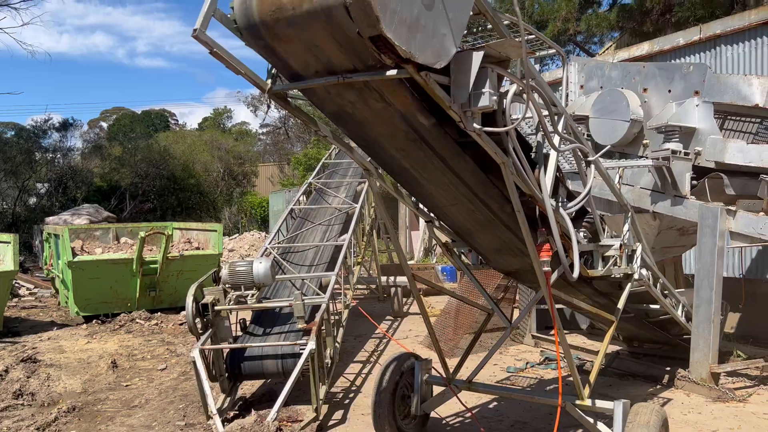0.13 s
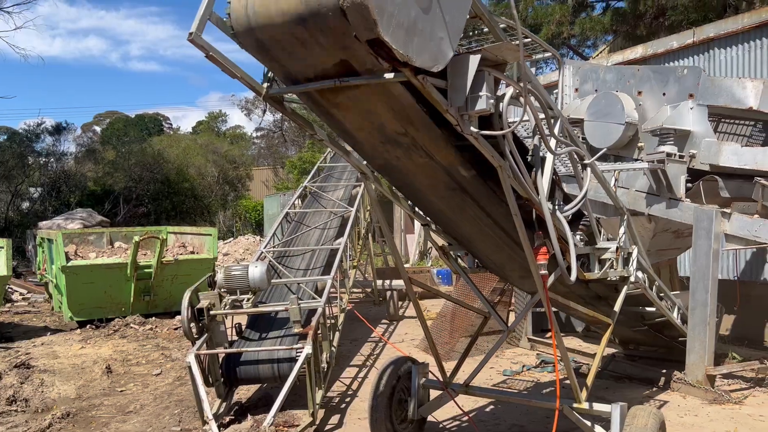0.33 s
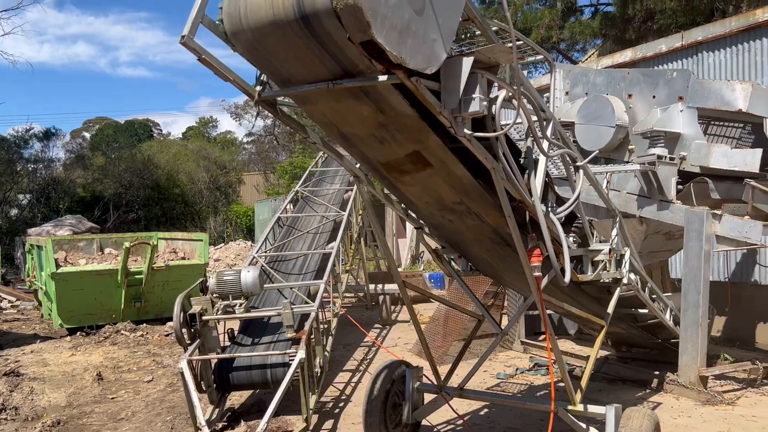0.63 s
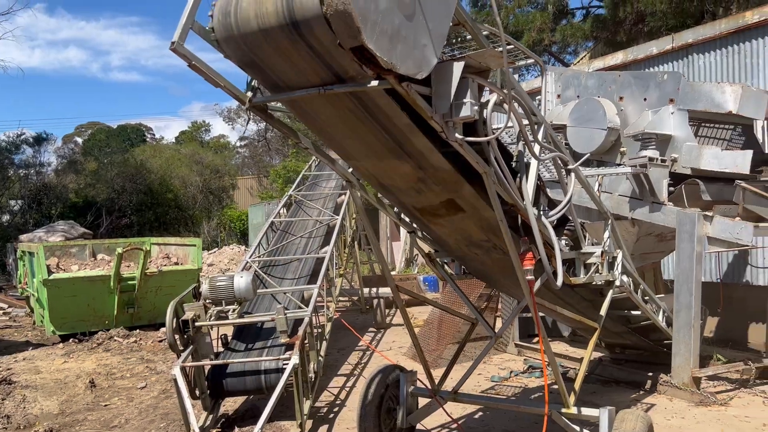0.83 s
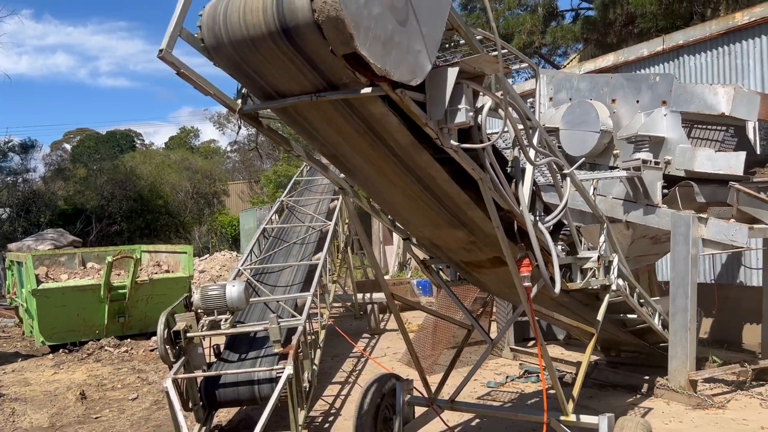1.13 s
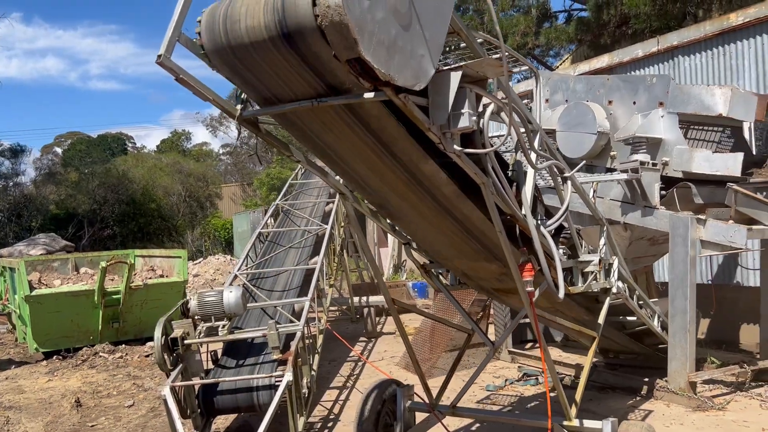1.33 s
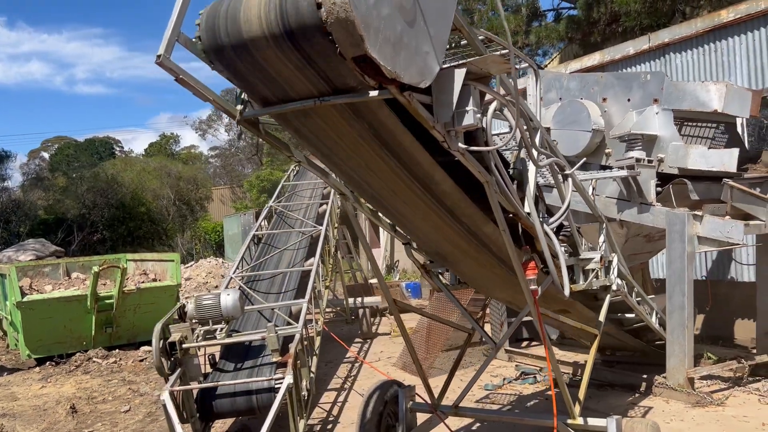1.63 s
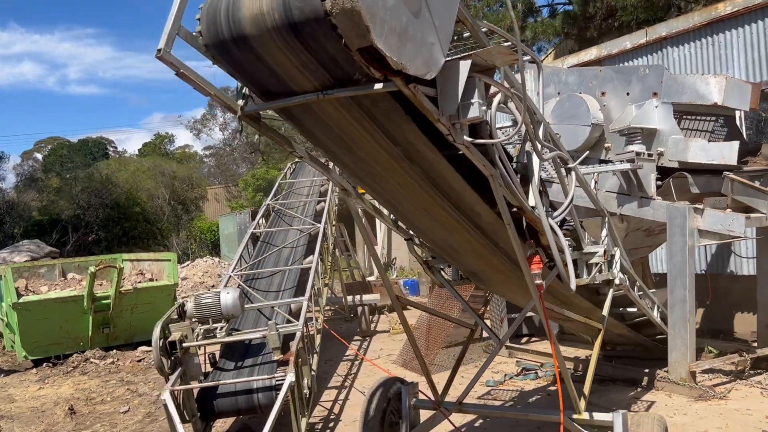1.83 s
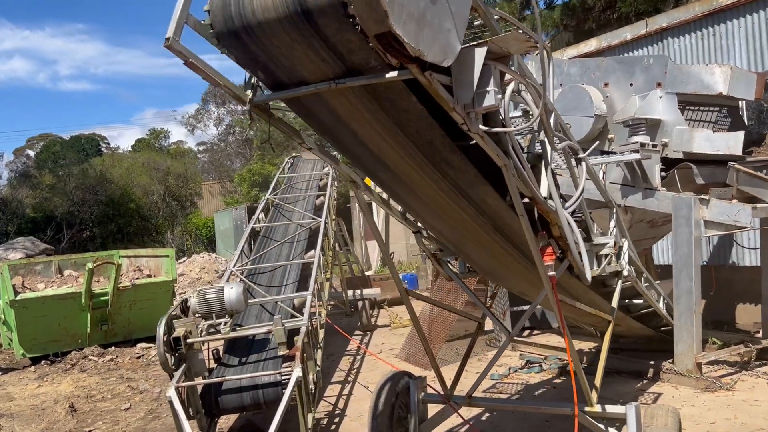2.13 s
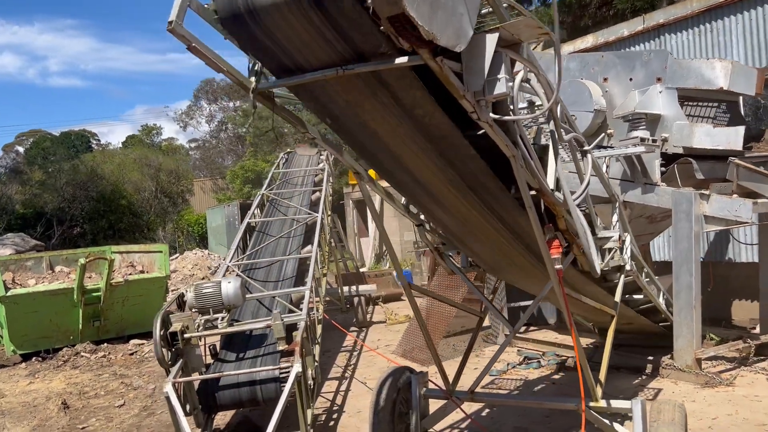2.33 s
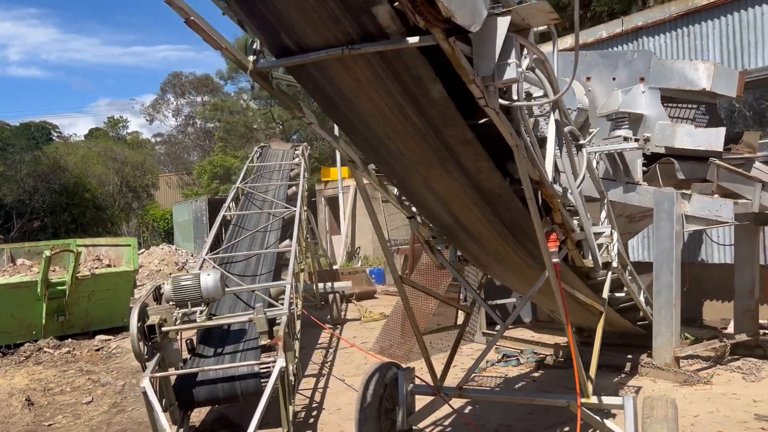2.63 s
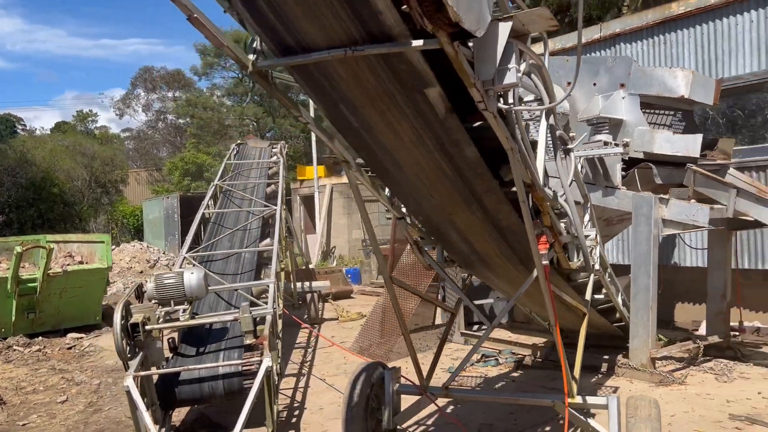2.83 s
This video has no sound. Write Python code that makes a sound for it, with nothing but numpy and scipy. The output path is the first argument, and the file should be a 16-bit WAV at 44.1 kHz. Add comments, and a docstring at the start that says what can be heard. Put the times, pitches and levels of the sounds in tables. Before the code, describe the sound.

A belt conveyor rumbles steadily nearby for about three seconds, with a wavering metal hum, clattering rollers, a rasping belt and a faint hiss of grit. Short, ringing metal clacks come irregularly: several from 0.1 to 1.2 seconds, three around 1.6, a pair near 2.3 and another near 2.8. The steel frame groans briefly around 0.2, 0.5 and 1.1 seconds.

```python
"""In a dirt yard, a mobile belt conveyor runs steadily a few metres away.
Rollers and belt drum on the steel frame, whose panels drone, ring and now and then groan.
The belt rasps on a roller, and trickling grit hisses over it.
Again and again something on the belt catches metal and clacks, often two or three times in a row.
Each clack is a short chattering scrape that sets the steel ringing."""
import sys
import numpy as np
from scipy import signal
from scipy.fft import rfft, irfft
from scipy.io import wavfile

SR = 44100
rng = np.random.default_rng(int(sys.argv[2]) if len(sys.argv) > 2 else 0)


def put_to_file(sound):
    """Save the sound as 16-bit audio at rate SR, in the file named by the first command-line argument."""
    columns = np.atleast_2d(sound).T  # one column per channel
    safe = np.clip(columns, -1, 1)
    whole_steps = np.round(safe * 32767)
    wavfile.write(sys.argv[1], SR, whole_steps.astype(np.int16))


N = 130977

# Levels are relative: a higher dB number is louder.
# tone colour of the frame's rumble (frequency [Hz], level [dB])
RUMBLE_COLOUR = [(25, -114), (48, -6), (64, -25.5), (100, -12.5), (160, -6), (300, -3), (560, 1), (800, -4),
                 (1300, -11.5), (1900, -13), (2400, -23.5), (4000, -33.5), (9000, -57)]
# how the load on the belt swells the rumble (time [s], level [dB])
BELT_LOAD = [(.04, -22.5), (.26, -19), (.38, -23), (.58, -19), (.82, -22.5), (1.12, -21.5), (1.4, -22.5),
             (2.1, -23), (2.4, -22), (2.67, -25), (2.8, -21.5), (2.95, -26)]
# notes the panels ring at; a narrow one rings longer (pitch [Hz], width [Hz], level [dB])
PANEL_NOTES = [(312, 68, -39), (571.6, 4.7, -39.5), (634, 8.8, -51.5), (1474, 12, -42), (1672, 45, -69),
               (1982, 7.4, -40), (2110, 8.2, -43.5), (2610, 27, -52), (3020, 20, -50.5)]
# tone colour of the clattering rollers (frequency [Hz], level [dB])
ROLLER_COLOUR = [(500, -33), (900, 8), (1150, 5.5), (1450, 1), (1900, -9), (2600, -40), (5000, -59)]
# loudness of the rollers (time [s], level [dB])
ROLLER_LEVEL = [(.05, -29), (.3, -30), (.4, -38), (.58, -64), (.72, -29), (.83, -40), (1.0, -34),
                (1.13, -31.5), (1.3, -33.5), (1.7, -32.5), (2.15, -29), (2.38, -30.5), (2.65, -31.5),
                (2.78, -29.5), (2.95, -27)]
# faint tones of the drive (pitch [Hz], level [dB], pitch drift [Hz])
DRIVE_TONES = [(82.3, -47.5, 0.6), (192, -50, 0), (242.1, -42, 3)]
# the frame's three main hums (pitch [Hz], pitch drift [Hz])
FRAME_HUMS = [(322.5, 2.03), (448, 2.94), (527, 3.69)]
# how those hums swell (time [s], first hum [dB], second hum [dB], third hum [dB])
HUM_SWELLS = [(.05, -29.5, -23, -53), (.18, -22.5, -37, -46), (.32, -22, -23.5, -57),
              (.48, -32.5, -55, -23), (.7, -29.5, -57, -59), (1.0, -34, -24.5, -54), (1.18, -36, -36, -37),
              (1.33, -28.5, -24, -39), (1.551, -29, -35, -31.5), (1.8, -29.5, -40, -28.5),
              (2.1, -34.5, -38, -41), (2.3, -33, -31.5, -29.5), (2.48, -31, -21.5, -52),
              (2.66, -27.5, -31, -68), (2.82, -41, -28, -25), (2.95, -43, -35, -61)]
# the belt rasping on a roller (time [s], pitch [Hz], level [dB])
RASP_PATH = [(.04, 1820, -33), (.12, 1800, -36), (.3, 1830, -32.5), (0.391, 1830, -32.5), (.46, 1820, -33),
             (.6, 1830, -28.5), (.72, 1840, -33), (.79, 1900, -31.5), (.85, 1850, -47), (.92, 1850, -34.5),
             (1.06, 1810, -35.5), (1.351, 1800, -37), (1.45, 1800, -40), (2.95, 1840, -38.5)]
# tone colour of the hissing grit (frequency [Hz], level [dB])
GRIT_COLOUR = [(1200, -11.5), (2500, 3.5), (4000, 1), (6300, -0.5), (8500, 3), (10500, -2.5), (12500, -7.5),
               (15500, -9.5)]
# flow of grit (time [s], level [dB])
GRIT_FLOW = [(.05, -39), (.2, -38), (.38, -39.5), (.66, -37.5), (.85, -41.5), (1.1, -38.5), (1.28, -40),
             (1.4, -41), (1.62, -38), (1.9, -39.5), (2.2, -39.5), (2.5, -38.5), (2.68, -41.5),
             (2.95, -37.5)]
# catches on the metal (time [s], level [dB], rise [s], scrape length [s], fade [s],
# clang [dB], bright ring [dB], body and steel ring [dB])
CLACK_EVENTS = [(0.116, -36.5, 0.0055, 0.012, 0.011, -14, -15, 4),
                (0.275, -29, 0.0045, 0.013, .014, -16, -4, -1),
                (0.427, -21.5, 0.0076, 0.014, .009, -14, 3, -3.5),
                (.463, -38, 0.0034, 0.005, .012, -10, -10, 4),
                (0.557, -23, 0.0022, 0.0084, 0.017, -5, -8, -7.5),
                (0.674, -36.5, 0.0054, .012, .012, -10, -9, 1),
                (0.875, -27.5, 0.0047, 0.014, 0.011, -3, -4, -4),
                (1.038, -24, 0.0079, 0.017, .014, -7, -0.5, -3.5),
                (1.102, -33, 0.0034, 0.012, .014, -12, -12, 1),
                (1.172, -27, .007, 0.018, 0.01, -12, -2, -4),
                (1.531, -29, 0.0015, 0.0089, 0.0092, -12, 4.5, -1),
                (1.648, -24, .005, 0.016, 0.02, -16, 4, -3), (1.766, -26, .003, 0.0069, 0.016, -10, 6, -1),
                (1.995, -38.5, .005, 0.0086, 0.012, -7, 7, 4),
                (2.2302, -21, .0008, 0.028, 0.018, -12, -0.5, -0.5),
                (2.3641, -23, .0006, 0.016, 0.016, 5, -2, -0.5),
                (2.7302, -24, .0004, 0.004, 0.016, -9, 5, 0.5),
                (2.84, -24, 0.0047, 0.011, 0.013, -2, 7, -2),
                (2.867, -32, 0.0025, 0.0073, 0.013, -9, -1, -3.5)]
# main notes of the struck steel (pitch [Hz], level [dB], time to fade by 60 dB [s])
STEEL_NOTES = [(1716, 6.5, 0.47), (1850, -6, 0.15), (2060, -17, 0.06), (2460, -1, 0.14), (2907, 3, 0.072),
               (3237, -1, 0.1), (3530, -6.5, 0.11), (3800, -16, 0.1), (4170, -16, 0.06), (4969, -3, 0.065),
               (5650, -16, 0.069), (6196, -2.5, 0.074), (6870, -1.5, 0.029), (7490, -1, 0.039)]
# its clang, which depends on where the blow lands (pitch [Hz], level [dB], time to fade by 60 dB [s])
CLANG_NOTES = [(4484, 0, .09)]
# its bright ring, which does too (pitch [Hz], level [dB], time to fade by 60 dB [s])
BRIGHT_NOTES = [(8100, 3, 0.016), (8350, -4.5, 0.029), (8430, 0.5, 0.022), (11300, -13, .03)]
# tone colour of a clack's sharp scrape (frequency [Hz], level [dB])
SCRAPE_COLOUR = [(1000, -23.5), (3000, 7.5), (6000, 0.5), (8500, 1), (11000, 5.5), (13000, -16),
                 (15500, -24)]
# tone colour of its duller body (frequency [Hz], level [dB])
BODY_COLOUR = [(300, -1), (900, 8), (1700, 11.5), (2500, 8.5), (4000, -0.5), (6000, -4), (10000, -20)]
# swells in which the frame groans (peak time [s], half-length [s], level [dB])
GROAN_SWELLS = [(.21, 0.052, -26.5), (.48, 0.12, -30.5), (1.11, 0.075, -28)]
# notes of the groan (pitch [Hz], half-width of each filter [Hz], level [dB])
GROAN_NOTES = [(500, 41, -20), (719, 16, 6.5)]
# sound that left and right do not share (frequency [Hz], level [dB])
STEREO_SPREAD = [(50, -31), (130, -21), (300, -19.5), (600, -10.5), (1200, -7.5), (5000, -6), (9000, -9),
                 (15000, -54)]
# how much louder the left is than the right (frequency [Hz], level [dB])
LEFT_BALANCE = [(100, 0), (320, 0), (600, -2), (1200, -1.8), (2200, -0.8), (4500, 3), (9000, 0.3)]
# how far the left wave runs ahead of the right (frequency [Hz], phase [radians])
LEFT_LEAD = [(300, 0), (750, -.3), (1500, -.1), (3000, .6), (6200, .1), (7400, .6), (8200, .2),
             (10200, -3.1), (12200, -6.3), (13700, -9.4), (15300, -12.5)]


def undb(db):
    """Turn decibels into a number to multiply by."""
    return 10 ** (np.asarray(db) / 20)


def unit(x):
    """Scale to an average power of 1."""
    return x / np.sqrt(np.mean(x ** 2))


def curve(rows):
    """Join (time, value) rows by straight lines."""
    return np.interp(np.arange(N) / SR, *np.array(rows).T)


def over_hz(rows):
    """Join (frequency, value) rows, giving each octave equal room."""
    hz, value = np.array(rows).T
    return np.interp(np.log(np.arange(N + 1) * SR / (2 * N) + 1), np.log(hz), value)


def shape(x, gain):
    """Turn each frequency up or down by its own gain."""
    return irfft(rfft(x, 2 * N) * gain, 2 * N)[..., :N]


def colour(x, rows):
    """Give a sound a tone colour; white noise keeps its power."""
    cepstrum = irfft(np.log(unit(undb(over_hz(rows)))))
    # using only the first half makes the filter ring after a hit, never before it
    return shape(x, np.exp(rfft(2 * cepstrum[:N], 2 * N) - cepstrum[0]))


def ring(x, hz, width_hz):
    """Let a sound ring at one pitch; white noise keeps its power."""
    r = np.exp(-np.pi * width_hz / SR)
    feed = np.sqrt((1 - r * r) / 2) * np.array([1, 0, -1])
    return signal.lfilter(feed, [1, -2 * r * np.cos(2 * np.pi * hz / SR), r * r], x)


def drift(rate_hz):
    """A smooth random wobble, about 1 in size."""
    hz = np.arange(N + 1) * SR / (2 * N)
    return unit(shape(rng.standard_normal(N), np.exp(-(hz / rate_hz) ** 2)))


def noise():
    """Two noises: one that left and right share, and one that sets them apart."""
    return rng.standard_normal((2, N))


def impacts(per_s, spread_db):
    """Tiny hits of uneven size at random times."""
    hits = (rng.random((2, N)) < per_s / SR) * np.sign(noise())
    return unit(hits * undb(spread_db * np.clip(noise(), -2, 1)))


def tone(hz, drift_hz):
    """A tone that wavers in pitch and loudness."""
    phase = 2 * np.pi * np.cumsum(hz + drift_hz * drift(12.4)) / SR
    flutter = undb(2.1 * drift(9.7))
    return unit(flutter * np.array([np.sin(phase), np.cos(phase)]))


def frame_rumble():
    """Belt and rollers drum on the frame and ring its panels; the rumble follows the load."""
    knocks = unit(impacts(per_s=900, spread_db=1.5) + undb(1) * noise())
    panels = sum(undb(db) * ring(knocks, hz, width) for hz, width, db in PANEL_NOTES)
    return colour(knocks, RUMBLE_COLOUR) * undb(curve(BELT_LOAD)) + panels


def roller_clatter():
    """The rollers' many small knocks blur into a clatter that comes and goes."""
    return colour(impacts(per_s=1000, spread_db=2), ROLLER_COLOUR) * undb(curve(ROLLER_LEVEL))


def drones():
    """The drive hums faintly while three tones of the frame swell and fade."""
    drive = sum(undb(db) * tone(hz, drift_hz) for hz, db, drift_hz in DRIVE_TONES)
    swells = np.array(HUM_SWELLS)
    frame = sum(undb(curve(swells[:, [0, k + 1]])) * tone(hz, drift_hz)
                for k, (hz, drift_hz) in enumerate(FRAME_HUMS))
    return drive + frame


def belt_rasp():
    """The belt rubs on a roller, making a rough note that shifts in pitch."""
    path = np.array(RASP_PATH)
    pitch_hz = curve(path[:, [0, 1]]) + 16 * drift(24.8)
    phase = 2 * np.pi * np.cumsum(pitch_hz) / SR
    grip = np.array([[drift(rate_hz=61) for _ in range(2)] for _ in range(2)])
    rasp = unit(grip[0] * np.cos(phase) + grip[1] * np.sin(phase))
    return rasp * undb(curve(path[:, [0, 2]]))


def grit_hiss():
    """Grit trickles unevenly: tiny ticks in a louder hiss."""
    grains = unit(impacts(per_s=640, spread_db=6) + undb(12.5) * noise())
    flow = undb(curve(GRIT_FLOW) + drift(27))
    return colour(grains * flow, GRIT_COLOUR)


def clacks():
    """Something catches metal: a strike, a chattering scrape, ringing steel and a dying rattle."""
    chatter = impacts(per_s=2600, spread_db=2) * undb(2 * drift(220))
    hiss = noise()
    rattle = unit(noise() * undb(2.2 * drift(160)))
    strike_fade_s, rattle_fade_s = 0.0035, 0.067
    scrape, body, rings = np.zeros((3, 2, N))
    for at, db, rise_s, length_s, fade_s, clang_db, bright_db, body_db in CLACK_EVENTS:
        span = slice(int(at * SR), min(int(at * SR) + SR // 4, N))
        t = np.arange(span.stop - span.start) / SR
        rise = undb(db) * np.minimum(t / rise_s, 1)
        after_scrape = np.maximum(t - length_s, 0)
        # the strike dies quickly, so a faster bite makes it sharper
        strike = undb(3.5) * rise * np.exp(-t / strike_fade_s) * hiss[:, span]
        contact = rise * np.exp(-after_scrape / fade_s) * chatter[:, span]
        tail = undb(2) * rise * np.exp(-after_scrape / rattle_fade_s) * rattle[:, span]
        scrape[:, span] += strike + contact + undb(-13) * tail
        body[:, span] += undb(body_db) * (contact + tail)
        rings[:, span] += undb(body_db + 0.5) * struck_steel(contact + strike, STEEL_NOTES)
        rings[:, span] += undb(clang_db - 10) * struck_steel(contact, CLANG_NOTES)
        rings[:, span] += undb(bright_db - 7.5) * struck_steel(contact + strike, BRIGHT_NOTES)
    return undb(-6) * colour(scrape, SCRAPE_COLOUR) + undb(-5) * colour(body, BODY_COLOUR) + rings


def struck_steel(force, notes, scatter_db=2.2, detune=0.0097):
    """Each blow lands on a new spot, so the steel's notes vary a little in loudness and pitch."""
    chance = np.clip(rng.standard_normal((len(notes), 2)), -1, 1)
    sound = 0
    for (hz, db, fade_s), (louder, higher) in zip(notes, chance):
        width_hz = np.log(1000) / (np.pi * fade_s)
        sound += undb(db + scatter_db * louder) * ring(force, hz * (1 + detune * higher), width_hz)
    return sound / np.sqrt(len(notes))


def frame_groans():
    """The frame rings with a rough groan in a few short swells."""
    t = np.arange(N) / SR
    swell = sum(undb(db) * np.exp(-((t - at) / half_s) ** 2) for at, half_s, db in GROAN_SWELLS)
    groan = 0
    for hz, half_width, db in GROAN_NOTES:
        band = ring(noise(), hz, 2 * half_width)
        groan += undb(db) * unit(ring(band, hz, 2 * half_width))  # a second pass narrows the note
    return swell * groan


def scene():
    """The whole machine in stereo: left and right are alike in the bass and differ higher up."""
    running = frame_rumble() + roller_clatter() + drones() + belt_rasp() + grit_hiss()
    shared, apart = running + clacks() + frame_groans()
    spread = undb(over_hz(STEREO_SPREAD))
    side = shape(apart, spread)
    pair = np.array([shared + side, shared - side])
    tilt_db = over_hz(LEFT_BALANCE) / 2
    left_gain = undb(tilt_db) * np.exp(1j * over_hz(LEFT_LEAD))
    right_gain = undb(-tilt_db)
    return shape(pair, np.array([left_gain, right_gain]) / np.sqrt(1 + spread ** 2))


def record(dry):
    """Start after a moment of silence, round off the loudest peaks and cut the highest treble."""
    start_s, ceiling, top_hz = .035, .6, 15850
    opened = dry * (np.arange(N) / SR > start_s)
    rounded = opened / (1 + (opened / ceiling) ** 4) ** (1 / 4)
    return signal.sosfilt(signal.ellip(10, .2, 80, top_hz, fs=SR, output="sos"), rounded)


dry = scene()
out = record(dry)
put_to_file(out)
```